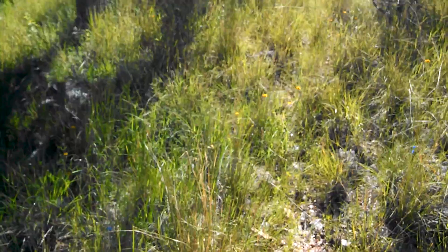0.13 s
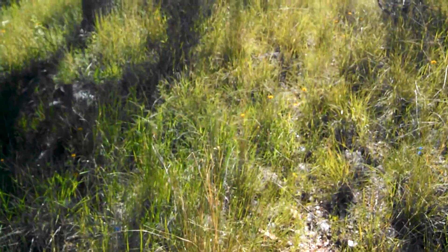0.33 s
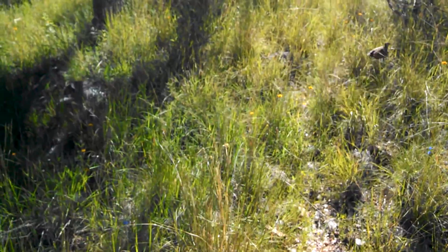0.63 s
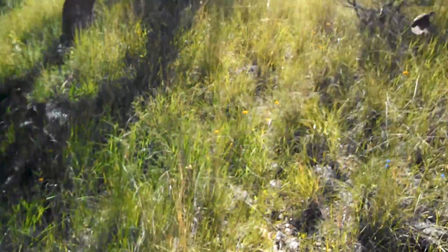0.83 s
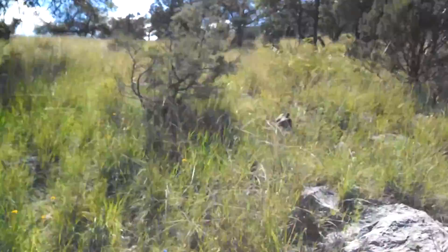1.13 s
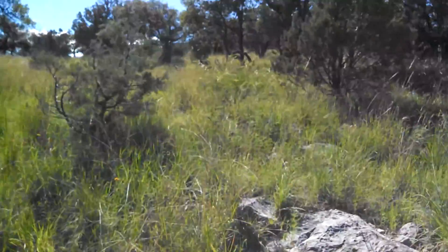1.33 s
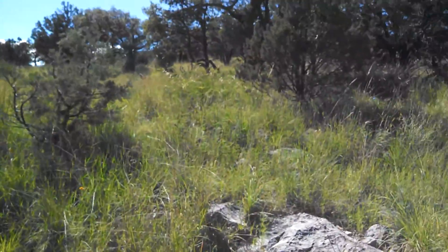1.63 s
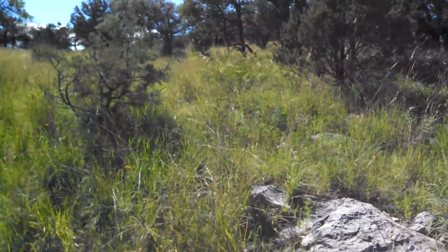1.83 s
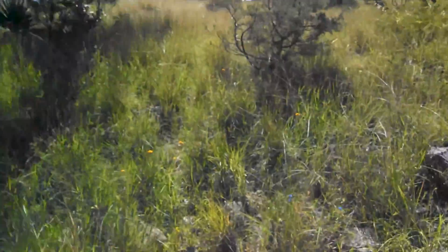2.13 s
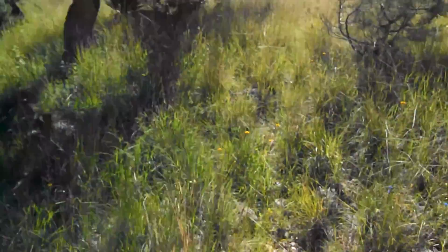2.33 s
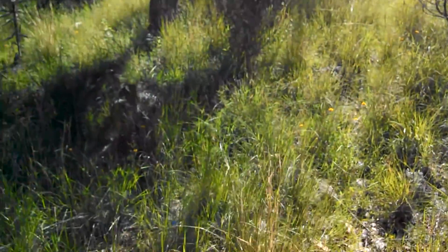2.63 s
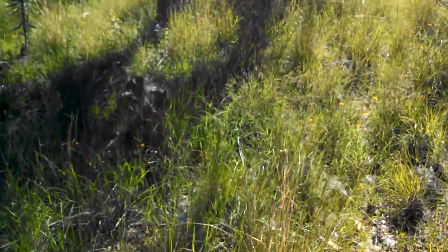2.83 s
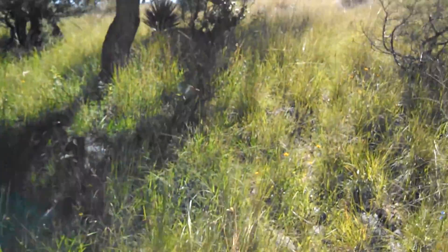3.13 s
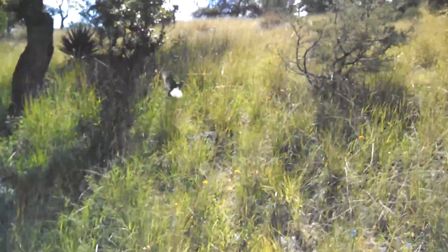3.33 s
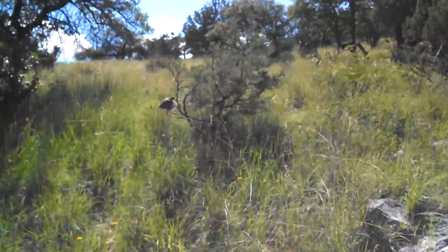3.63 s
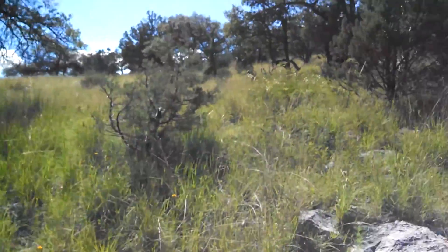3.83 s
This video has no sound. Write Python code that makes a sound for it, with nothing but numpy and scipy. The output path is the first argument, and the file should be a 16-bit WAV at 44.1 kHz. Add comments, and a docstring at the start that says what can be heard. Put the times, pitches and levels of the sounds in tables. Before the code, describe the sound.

Quail burst from dry grass at about 0.5 seconds, with rapid wing flaps, rustling and snapping stems until 0.9. A second flurry runs from 2.8 to 3.2 seconds, and a brief flap comes near 3.9. From 0.4 seconds on, young birds repeat high, falling, slightly hoarse whistles and short chucks. Light wind rumbles on the microphone, with a sharper bump around 2 seconds.

```python
"""Quail flushing from dry grass

Quail burst out of hillside grass twice, wings thrashing through the stems, while young birds
give falling whistles and short chucks. A light wind buffets the two ports of a hand-held
camera, which widens its stereo by subtracting each port, delayed, from the other."""
import sys
import numpy as np
from scipy import signal
from scipy.fft import rfft, irfft, next_fast_len
from scipy.io import wavfile
from scipy.ndimage import map_coordinates

SR = 44100
rng = np.random.default_rng(int(sys.argv[2]) if len(sys.argv) > 2 else 0)


def unload_audio(sound):
    """Save the sound as a 16-bit wav file, at the path given as the first command line argument."""
    columns = np.transpose(np.atleast_2d(sound))
    # keep every value between -1 and 1, then stretch to whole-number steps
    steps = np.round(np.clip(columns, -1, 1) * 32767)
    wavfile.write(sys.argv[1], SR, steps.astype(np.int16))


N = 176400


def amp(db):
    """Decibels to gain."""
    return 10 ** (np.asarray(db) / 20)


def unit(x):
    """Scale to rms 1."""
    return x / np.sqrt(np.mean(x ** 2) + 1e-20)


def along(points, hz):
    """Interpolate (f/Hz, value) points on a log axis."""
    f, v = np.transpose(points)
    return np.interp(np.log(hz + 1), np.log(f + 1), v)


def clock():
    """Sample times in s."""
    return np.arange(N) / SR


def wobble(rate_hz, size=N):
    """Smooth random curve with knots at rate_hz."""
    return map_coordinates(rng.standard_normal(4096), [np.arange(size) * rate_hz / SR], mode="wrap")


def filtered(x, response):
    """Apply a complex frequency response."""
    n = x.shape[-1]
    m = next_fast_len(n + 4096)
    return irfft(rfft(x, m) * response(np.fft.rfftfreq(m, 1 / SR)), m)[..., :n]


def add(out, start_s, x):
    """Mix x into out from start_s."""
    part = out[..., max(round(start_s * SR), 0):][..., :x.shape[-1]]
    part += x[..., :part.shape[-1]]


# likeness of the two ports: f/Hz, correlation
PORT_CORRELATION = [(200, 1), (700, 0.4), (1300, 0.48), (2000, -0.12), (4000, -0.031), (8000, -0.07),
                    (15000, 0.041)]

def port_noise(spectrum, correlation=PORT_CORRELATION, grain_db=0):
    """Coloured noise of rms 1, partly shared by the ports; grain_db breaks it into tiny grains."""
    def mid_side_gains(hz):
        angle = np.arccos(np.clip(along(correlation, hz), -1, 1)) / 2
        return amp(along(spectrum, hz)) * [np.cos(angle), np.sin(angle)]

    grains = np.repeat(rng.standard_normal(N // 24 + 1), 24)[:N]
    mid, side = filtered(rng.standard_normal((2, N)) * amp(grain_db * grains), mid_side_gains)
    return unit(np.array([mid + side, mid - side]))


# background air: f/Hz, density/dB
AIR_SPECTRUM = [(30, 10.5), (200, 6), (400, 9.5), (650, 5.5), (1000, -3), (2000, -8.5), (4000, -16),
                (7000, -14), (15000, -38)]

def air(level_db=-59):
    """Steady, faint outdoor hush."""
    return amp(level_db) * port_noise(AIR_SPECTRUM)


def hillside(x, t60_s=0.14, level_db=-12.5):
    """Faint, short scatter from trees and rocks."""
    t = np.arange(SR // 2) / SR
    tail = rng.standard_normal((2, len(t))) * np.exp(-np.log(1000) * t / t60_s)
    return amp(level_db) * signal.fftconvolve(x, tail / np.linalg.norm(tail[0]), axes=1)[:, :N]


# wind at the ports: t/s, level/dB
WIND_ENVELOPE = [(.28, -36.5), (.36, -24), (.5, -29), (.75, -26), (1.0, -32), (1.3, -37.5), (1.5, -30.5),
                 (1.62, -28.5), (1.7, -49.5), (1.82, -20.5), (1.99, -58), (2.07, -52), (2.16, -29),
                 (2.27, -19.5), (2.43, -34.5), (2.68, -30.5), (2.83, -28), (3.03, -31.5), (3.5, -32.5),
                 (3.87, -32.5), (4.0, -47.5)]
# single buffets, and a dull knock on the camera body near 1.96 s: t/s, f/Hz, width/s, level/dB
WIND_BUFFETS = [(0.451, 92, 0.0049, -9.5), (1.477, 115.6, 0.0071, -19.5), (1.525, 103, 0.011, -19.5),
                (1.6, 84.9, 0.0093, -25), (1.812, 98.6, 0.013, -15.5), (1.857, 115, 0.0058, -14.5),
                (1.965, 122, 0.0048, -4.5), (1.976, 60, 0.016, -14), (2.235, 193, 0.0031, -13),
                (2.286, 137, 0.0035, -16), (2.392, 108, 0.0056, -15.5), (2.534, 200, 0.0034, -24),
                (2.786, 128, 0.0065, -18.5), (2.83, 114, 0.0054, -13), (2.867, 84, 0.0095, -12.5),
                (2.973, 65, 0.003, -11.5)]
# hard buffets breaking up, and the crack of the knock on the camera body near 1.96 s: t/s, width/s, level/dB
WIND_PUFFS = [(1.52, 0.014, -49), (1.857, .006, -42), (1.964, 0.0034, -14), (2.231, 0.013, -31.5),
              (2.265, 0.014, -35), (2.285, .004, -38), (2.534, 0.012, -38), (2.86, 0.1, -38.5)]
# eddies and puffs: f/Hz, density/dB
RUMBLE_SPECTRUM = [(20, -44), (40, -2), (62, 4.5), (100, -1.5), (135, -7.5), (200, -20), (300, -32.5),
                   (600, -51.5), (2000, -106)]
PUFF_SPECTRUM = [(80, -13), (180, 14), (320, 0.5), (450, -6.5), (650, -28), (1100, -28), (3000, -63)]

def wind(rumble_gain_db=-4, puff_gain_db=-2):
    """Low eddies, different at each port, with brief rough puffs at both ports, buffets on the left port, and a
    dull knock on the camera body."""
    t = clock()
    rumble_db = np.interp(t, *np.transpose(WIND_ENVELOPE)) + rumble_gain_db + 1.5 * wobble(14)
    out = amp(rumble_db) * port_noise(RUMBLE_SPECTRUM, correlation=[(60, 0)])
    for peak_s, hz, width_s, db in WIND_BUFFETS:
        pulse = 1 / np.cosh(np.clip((t - peak_s) / width_s, -20, 20)) ** 2
        out[0] += amp(db) * pulse * np.sin(2 * np.pi * hz * (t - peak_s))
    puffs = np.zeros(N)
    for peak_s, width_s, db in WIND_PUFFS:
        puffs += amp(db + puff_gain_db) * np.exp(-np.minimum(abs(t - peak_s) / width_s, 20))
    return out + puffs * port_noise(PUFF_SPECTRUM, correlation=[(200, 0.011)])


# grass rustle: t/s, level/dB
RUSTLE_ENVELOPE = [(.28, -54), (.35, -52.5), (.48, -49), (.54, -45), (.83, -43), (.9, -51.5), (1.0, -56),
                   (1.13, -57.5), (1.18, -51), (1.29, -56), (1.39, -44.5), (1.5, -48.5), (1.6, -57),
                   (1.9, -59.5), (2.08, -55), (2.14, -55), (2.27, -55.5), (2.5, -62), (2.61, -61),
                   (2.74, -51), (2.82, -46), (3.0, -70), (3.09, -51.5), (3.3, -52.5), (3.55, -54.5),
                   (3.8, -56), (4.0, -55)]
# snaps: t/s, level/dB, decay/s, tilt/(dB/octave)
STEM_SNAPS = [(0.557, -33, 0.0026, 0), (0.6253, -27, .002, -1.5), (0.6821, -27.5, 0.0051, -1),
              (0.741, -29.5, .003, 5.5), (0.8136, -32, 0.0032, -2.5), (.861, -29, .003, 10),
              (1.16, -32.5, 0.00075, -3.5), (2.266, -41.5, 0.0017, 3.5), (2.432, -44, 0.0022, -8),
              (2.625, -43, 0.0016, -3.5), (2.689, -41, 0.0027, -8.5), (2.864, -30, 0.0014, -6),
              (2.933, -24.5, 0.0074, 4), (2.986, -31, .002, 1), (3.037, -24.5, .002, 4),
              (3.045, -18, 0.0013, 9), (3.154, -30.5, 0.0018, -3), (3.219, -36, 0.0013, -4),
              (3.266, -40, 0.0045, 0), (3.972, -37.5, 0.0037, 2.5), (3.985, -38, 0.0017, 4)]
# rustle and snap: f/Hz, density/dB
RUSTLE_SPECTRUM = [(300, -13), (1000, -6.5), (2500, 4.5), (4200, 1), (6000, -4.5), (9000, 1), (11500, -3.5),
                   (14000, 6), (15500, 6.5)]
SNAP_SPECTRUM = [(200, -10), (1000, -2.5), (4500, -0.5), (15000, 1.5)]

def grass(snap_gain_db=-1):
    """Dry stems rustle and snap, and wing tips crack against them."""
    rustle_db = np.interp(clock(), *np.transpose(RUSTLE_ENVELOPE)) + 1.7 * wobble(70)
    out = amp(rustle_db) * port_noise(RUSTLE_SPECTRUM, grain_db=2.5)
    t = np.arange(SR // 20) / SR
    for start_s, db, decay_s, tilt in STEM_SNAPS:
        burst = rng.standard_normal((2, len(t))) + 0.5 * rng.standard_normal(len(t))
        crack = filtered(burst, lambda hz: amp(along(SNAP_SPECTRUM, hz) + tilt * np.log2(hz + 500)))
        add(out, start_s, amp(db + snap_gain_db) * np.exp(-t / decay_s) * unit(crack))
    return out


# strokes through the grass: peak t/s, rise/s, fall/s, swish level/dB, flap level/dB
WING_STROKES = [(0.537, 0.017, 0.0099, -28, -38.5), (.559, 0.011, 0.0089, -24.5, -32),
                (0.61, 0.012, 0.026, -33, -33), (0.625, 0.01, 0.0037, -26, -56),
                (0.687, 0.0075, 0.0063, -25.5, -28.5), (.723, 0.006, 0.023, -39.5, -36),
                (0.744, 0.0019, 0.0035, -27.5, -24), (0.785, 0.01, 0.0087, -35.5, -36),
                (0.8, 0.0057, 0.008, -34.5, -38), (0.816, 0.0028, 0.007, -45, -35),
                (0.866, 0.0041, 0.0083, -37.5, -38), (0.937, 0.003, 0.017, -45.5, -47.5),
                (2.804, 0.0076, 0.0057, -28, -35), (2.816, 0.006, 0.04, -32.5, -42.5),
                (2.866, 0.004, 0.0077, -25.5, -32.5), (2.877, 0.0069, 0.014, -33, -41),
                (2.935, 0.013, 0.017, -30.5, -36), (2.99, 0.019, 0.016, -31, -37.5),
                (3.046, 0.013, 0.0082, -30, -35.5), (3.106, 0.0044, 0.0038, -37.5, -36.5),
                (3.158, 0.00084, 0.0067, -35.5, -58), (3.218, 0.003, 0.0087, -38.5, -44),
                (3.878, 0.0025, 0.0076, -32, -33.5), (3.89, 0.0042, 0.0044, -34, -38.5)]
# swish and flap: f/Hz, density/dB
SWISH_SPECTRUM = [(200, -18), (1000, -4.5), (1800, -1.5), (3200, 4), (4500, 1), (6000, -3.5), (9000, 3.5),
                  (11500, -2.5), (14000, 9.5), (15500, 4.5)]
FLAP_SPECTRUM = [(100, 1), (250, 2.5), (420, -13.5), (640, 2.5), (1000, -10.5), (1500, -12.5), (2200, -11),
                 (4000, -66), (9000, -33)]

def wings(swish_gain_db=-1.5, flap_gain_db=-2):
    """Each stroke swells and dies: crackling feathers and stems over a soft flap."""
    t = clock()
    swish_power, flap_power = np.zeros((2, N))
    for peak_s, rise_s, fall_s, swish_db, flap_db in WING_STROKES:
        falloff = np.maximum((peak_s - t) / rise_s, (t - peak_s) / fall_s)
        stroke = np.exp(-np.minimum(falloff, 20))
        swish_power += (amp(swish_db) * stroke) ** 2
        flap_power += (amp(flap_db) * stroke) ** 2
    clumps = amp(1.37 * wobble(500))
    swish = amp(swish_gain_db) * np.sqrt(swish_power) * port_noise(SWISH_SPECTRUM)
    flap = amp(flap_gain_db) * np.sqrt(flap_power) * port_noise(FLAP_SPECTRUM, grain_db=3.5)
    return clumps * (swish + flap)


# chucks, many ending a whistle: t/s, length/s, start f/Hz, end f/Hz, level/dB, rasp share
CHUCK_CALLS = [(0.282, 0.0074, 650, 510, -45, 0.17), (0.585, 0.0078, 1180, 730, -34, 0.4),
               (0.6985, 0.0052, 870, 670, -23.5, 0.1), (.756, 0.0084, 860, 620, -19.5, .08),
               (1.058, 0.017, 2100, 570, -58, .5), (1.336, 0.016, 1830, 750, -54, 0.7),
               (1.496, 0.017, 1340, 447, -47, 0.61), (1.546, 0.016, 1660, 516, -50, 0.28),
               (1.1587, 0.0082, 697, 520, -40, 0.18), (2.056, 0.02, 1200, 446, -45.5, 0.97),
               (2.562, 0.0206, 1250, 485, -49.5, 0.41), (2.803, 0.0125, 1080, 743, -39, .4),
               (2.898, 0.012, 920, 690, -43, 0.59), (3.009, 0.008, 825, 610, -34, 0.49),
               (3.117, 0.018, 924, 596, -41, 0.35), (3.512, 0.014, 1520, 1140, -50.5, 1)]

def chucks(octave_db=-19, left_db=-2, right_db=-5):
    """Quick downward sweeps of the voice with abrupt onsets, clean or rough."""
    out = np.zeros(N)
    for start_s, length_s, start_hz, end_hz, db, rasp in CHUCK_CALLS:
        progress = np.arange(0, 1, 1 / (length_s * SR))
        phase = 2 * np.pi * np.cumsum(start_hz * (end_hz / start_hz) ** progress) / SR
        tone = np.sin(phase) + amp(octave_db) * np.sin(2 * phase)
        swell = np.sqrt(abs(np.sin(np.pi * progress)))
        roughness = 1 + rasp * wobble(1327, len(progress))
        add(out, start_s, amp(db) * swell * tone * roughness)
    return out * amp([[left_db], [right_db]])


def at_ports(tone, balance_db, lead_s, scatter_db=-21):
    """A call reaches the ports with a level and time offset, plus scatter from the grass."""
    sides = np.array([[0.5], [-0.5]])
    gains = amp(balance_db * sides)
    gains /= np.linalg.norm(gains)
    direct = filtered(tone, lambda hz: gains * np.exp(2j * np.pi * hz * lead_s * sides))
    scatter = tone * np.array([wobble(310, len(tone)), wobble(291.2, len(tone))])
    return direct + amp(scatter_db) * scatter


# one contour per whistle: t/s, f/Hz, fundamental level/dB, octave level/dB
WHISTLE_CONTOURS = [
    [(0.37, 2680, -52, -62), (0.385, 2407, -45, -50), (0.4, 2355, -39, -61), (0.42, 2120, -44.5, -44),
     (0.45, 1860.0, -63, -67), (0.495, 1760.0, -53, -39), (0.525, 1870, -41, -83), (0.585, 1550, -50, -33)],
    [(0.395, 2910, -61, -76), (0.42, 2640, -40, -68), (0.45, 2994, -37.5, -59), (0.5, 3156, -48, -63),
     (0.57, 3190, -41.5, -62), (0.62, 2830, -46, -39), (0.66, 2700, -31.5, -66), (0.72, 2420, -32.5, -57),
     (0.775, 2610, -33, -57)],
    [(0.86, 3090, -43, -74), (0.89, 2825, -34, -72), (0.91, 2627, -30.5, -66), (0.96, 2480, -35, -59),
     (0.99, 2363, -32, -60), (1.035, 2270, -41, -57), (1.06, 2010, -30, -63)],
    [(1.19, 3070, -60, -75), (1.205, 2713, -39, -72), (1.225, 2685, -41, -72), (1.245, 2510, -36.5, -61),
     (1.29, 2330, -36.5, -56), (1.335, 1970, -46.5, -59)],
    [(1.265, 2153, -40, -73), (1.28, 1833, -43.5, -53.5), (1.305, 1730, -73, -45.5),
     (1.325, 1797, -42, -42.5), (1.37, 1840, -44.5, -47.5), (1.425, 1695, -48.5, -49.5),
     (1.455, 1729, -51, -41), (1.495, 1463, -54, -36)],
    [(1.435, 1920, -50, -66), (1.46, 2028, -38, -54), (1.49, 1957, -40, -57), (1.52, 1846, -37, -57),
     (1.547, 1560, -43.5, -77)],
    [(1.774, 2705, -33, -81), (1.785, 2530, -39, -62), (1.82, 2230, -43.5, -45),
     (1.865, 2041, -35.5, -42.5), (1.93, 1953, -37, -38.5), (2.005, 2013, -42.5, -50),
     (2.03, 1773, -39, -49.5), (2.055, 1520, -61, -62)],
    [(1.782, 1996, -70, -70), (1.81, 1800, -77, -55), (1.845, 1594, -77, -49), (1.87, 1550, -77, -51)],
    [(2.11, 1880, -60, -79), (2.185, 1840, -57, -74)],
    [(2.295, 3100, -59, -78), (2.307, 2740, -44, -75), (2.325, 2630, -40, -77), (2.34, 3085, -47, -77),
     (2.37, 2820, -39.5, -82), (2.405, 2640, -49, -85), (2.435, 2490, -41.5, -57), (2.47, 2220, -55, -69)],
    [(2.405, 1584, -61, -67), (2.43, 1773, -51, -46), (2.455, 1560, -59, -49), (2.475, 1620, -65, -50),
     (2.52, 1590.0, -56, -52), (2.562, 1450, -55.5, -53)],
    [(2.53, 2665, -48, -82), (2.545, 2443, -43, -62), (2.57, 2178, -48, -72), (2.61, 2140, -55.5, -60),
     (2.645, 1914, -58, -59)],
    [(2.645, 1790, -49.5, -61), (2.7, 1796, -40, -52.5), (2.74, 1920.0, -50, -46),
     (2.765, 1902, -37, -49.5), (2.785, 2090.0, -40, -51), (2.83, 2152, -35, -43),
     (2.865, 1803, -40.5, -43.5)],
    [(2.99, 2810, -64, -49), (3.02, 2680.0, -41, -50), (3.04, 2356, -38, -45), (3.075, 2230.0, -42, -39),
     (3.1, 2050, -41, -53), (3.13, 2026, -37.5, -40), (3.16, 1828, -43, -52), (3.187, 1586, -58, -52)],
    [(3.305, 2753, -53, -84), (3.34, 2460.0, -40, -59), (3.365, 2120, -37.5, -54), (3.42, 1904, -40.5, -53),
     (3.45, 1843, -35.5, -50.5), (3.485, 1654, -49.5, -46), (3.51, 1600, -44.5, -46)],
    [(3.47, 2530, -59, -54), (3.5, 2900, -47.5, -58), (3.57, 2855, -46.5, -76), (3.62, 2497, -46.5, -61),
     (3.665, 2240, -46.5, -59.5), (3.7, 1802, -41, -49), (3.745, 1690, -44, -52), (3.785, 1646, -43, -56),
     (3.817, 1414, -44.5, -54)],
]
# per whistle: left over right/dB, left lead/ms, rasp share
WHISTLE_VOICES = [(13, .18, 0.03), (12, 0.035, 0.25), (13, -0.025, 0.027), (6.5, 0.054, .05),
                  (-6.5, -0.24, 0.037), (4.5, 0.12, 0.08), (-4, 0.344, 0.14), (21, 0.068, 0.15),
                  (10, -0.089, 0.046), (11, 0.27, 0.087), (15, 0.059, 0.074), (17, -.18, 0.043),
                  (3.5, -0.29, 0.13), (7, 0.18, 0.25), (7, 0.21, .15), (9, 0.23, .13)]
# per whistle: vibrato depth as share of pitch
VIBRATO_DEPTHS = [.004, .008, .002, .003, .003, .003, .018, .006, .003, .003, .003, .002, .012, .018, .016,
                  .01]

def whistles(vibrato_hz=39.2, jitter=0.0056, fade_s=0.0082, tone_gain_db=1.07, octave_gain_db=1.95):
    """Gliding tones with a hoarse octave; vibrato shakes the level, rasp adds quarter-pitch lines."""
    out = np.zeros((2, N))
    for contour, voice, depth in zip(WHISTLE_CONTOURS, WHISTLE_VOICES, VIBRATO_DEPTHS):
        balance_db, lead_ms, rasp = voice
        knots_s, *columns = np.transpose(contour)
        t = np.arange(knots_s[0] - fade_s / 2, knots_s[-1] + fade_s / 2, 1 / SR)
        n = len(t)
        hz, tone_db, octave_db = [np.interp(t, knots_s, column) for column in columns]
        vibrato = depth * np.cos(2 * np.pi * vibrato_hz * (t - knots_s[0]) + 0.3 * wobble(25, n))
        phase = 2 * np.pi * np.cumsum(hz * (1 + vibrato + jitter * wobble(189, n))) / SR

        octave_flutter = amp(18 * rasp * wobble(130, n))
        hoarseness = 1 + 1.8 * rasp * wobble(700, n)
        octave = unit(octave_flutter * hoarseness) * np.sin(2 * phase)
        tone = amp(tone_db + tone_gain_db) * np.sin(phase) + amp(octave_db + octave_gain_db) * octave

        fade = np.clip(np.minimum(t - t[0], t[-1] - t) / fade_s, 0, 1)
        flutter = amp(1.5 * wobble(109.8, n))
        tremolo = 1 - 1.1 * vibrato
        roughness = wobble(1400, n)
        subharmonics = 0.4 * (np.sin(phase / 4) + np.sin(phase / 2)) * (1 + 0.5 * wobble(65.6, n))
        tone *= fade * flutter * tremolo * (1 + rasp * (roughness + subharmonics))
        add(out, t[0], at_ports(tone, balance_db, lead_ms / 1000))
    return out


def scene():
    """Pressure at the two microphone ports."""
    birds = whistles() + chucks() + wings()
    return birds + hillside(birds) + grass() + wind() + air()


# channel balance: f/Hz, left over right/dB
CHANNEL_BALANCE = [(200, -2), (1500, -1.3), (2800, -0.55), (12000, -0.7)]

def record(dry, delay_s=16 / SR, start_s=0.278, fade_s=0.0047, cutoff_hz=15620):
    """Each channel is its port minus the delayed other one, silent until start_s and band-limited."""
    def response(hz):
        low_pass = 1 / np.sqrt(1 + (hz / cutoff_hz) ** 300)
        return low_pass * amp(along(CHANNEL_BALANCE, hz) * [[0.5], [-0.5]])

    wide = dry - filtered(dry[::-1], lambda hz: np.exp(-2j * np.pi * hz * delay_s))
    fade_in = np.clip((clock() - start_s) / fade_s, 0, 1)
    return filtered(wide * fade_in, response)


dry = scene()
out = record(dry)
unload_audio(out)
```